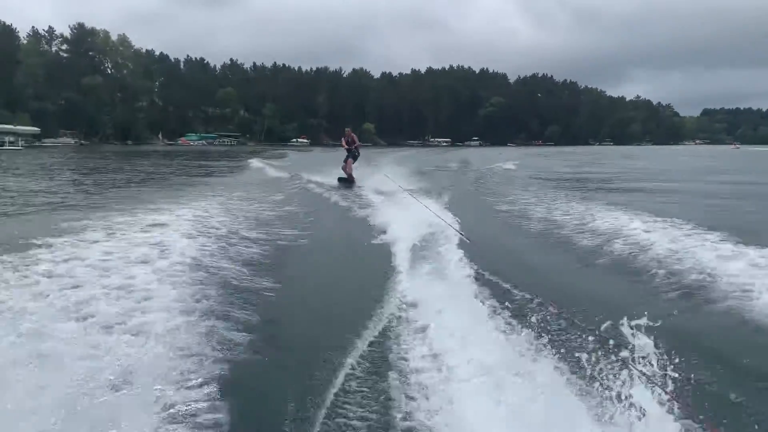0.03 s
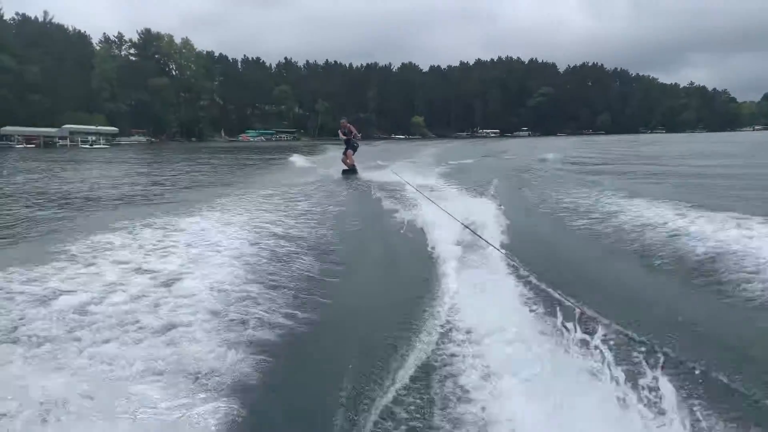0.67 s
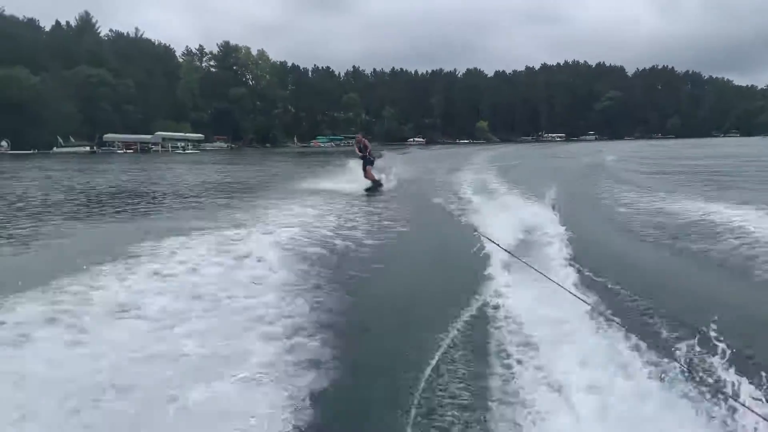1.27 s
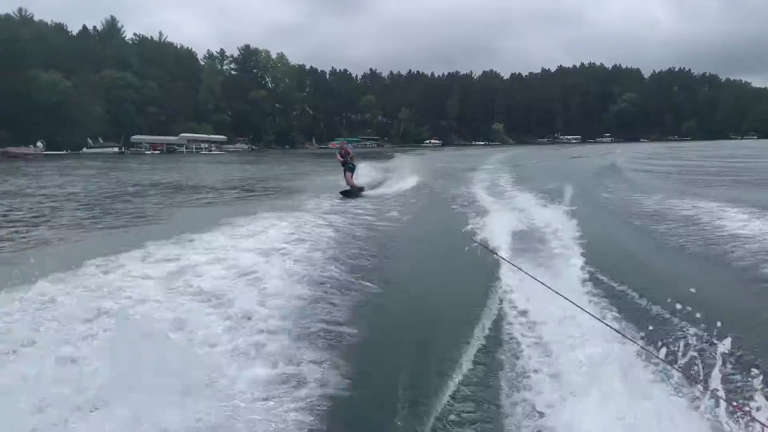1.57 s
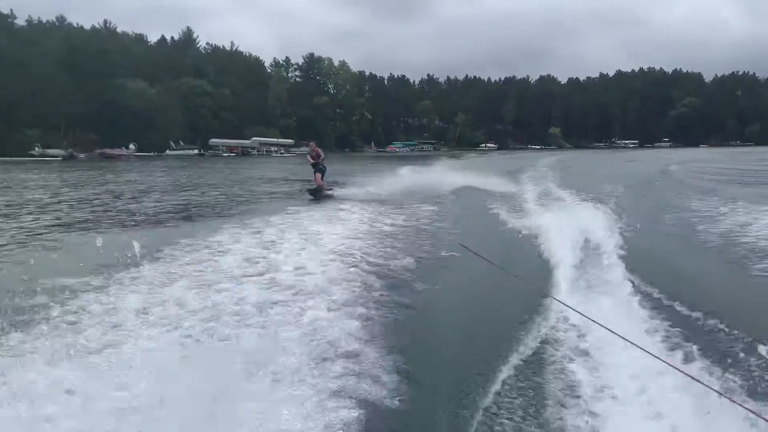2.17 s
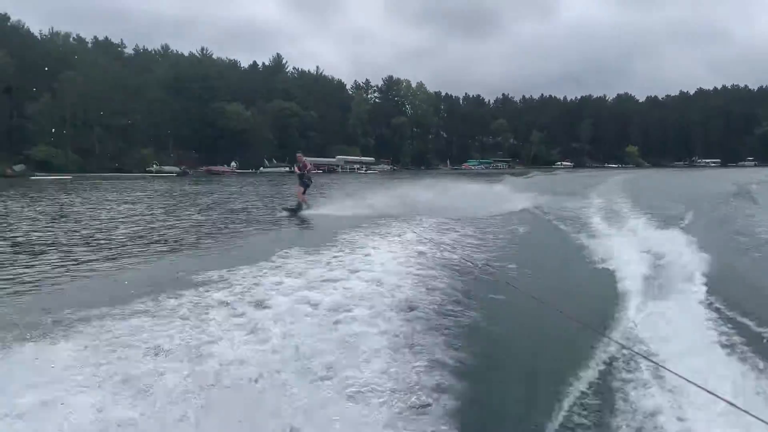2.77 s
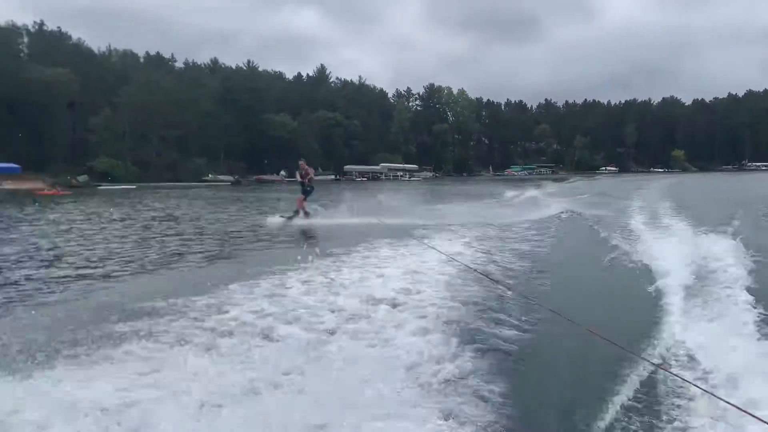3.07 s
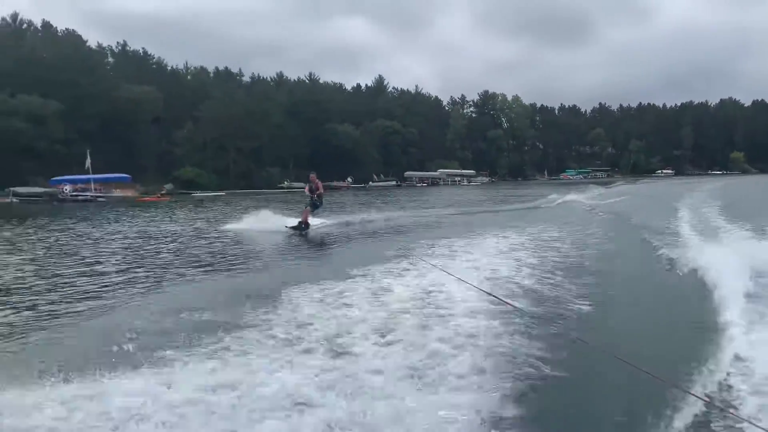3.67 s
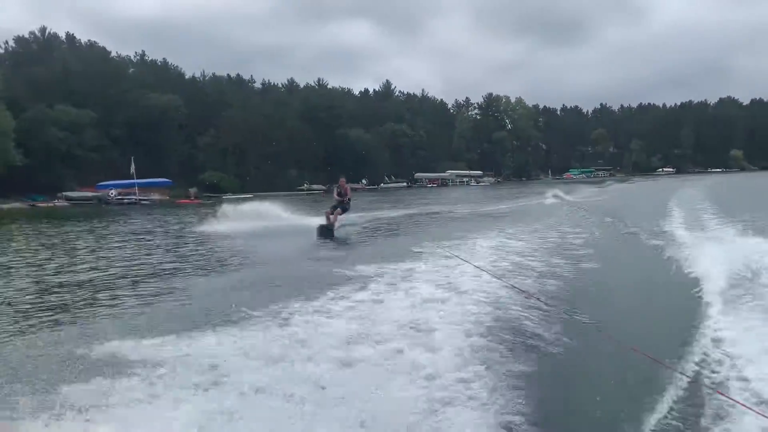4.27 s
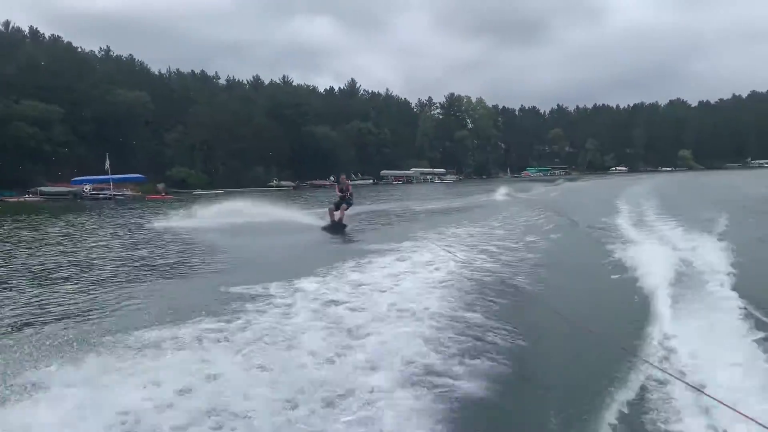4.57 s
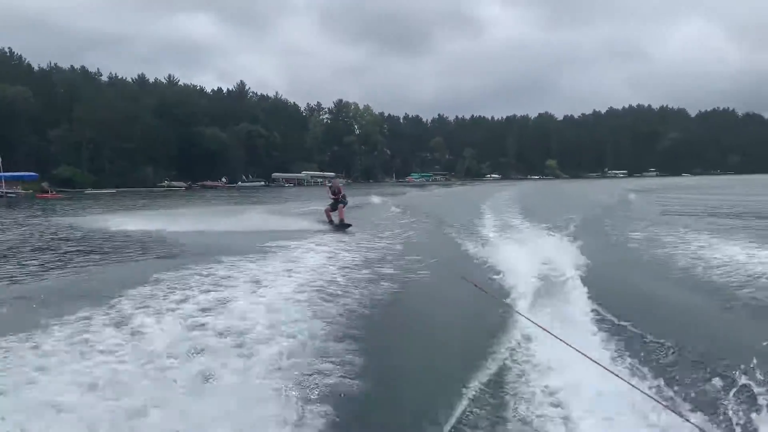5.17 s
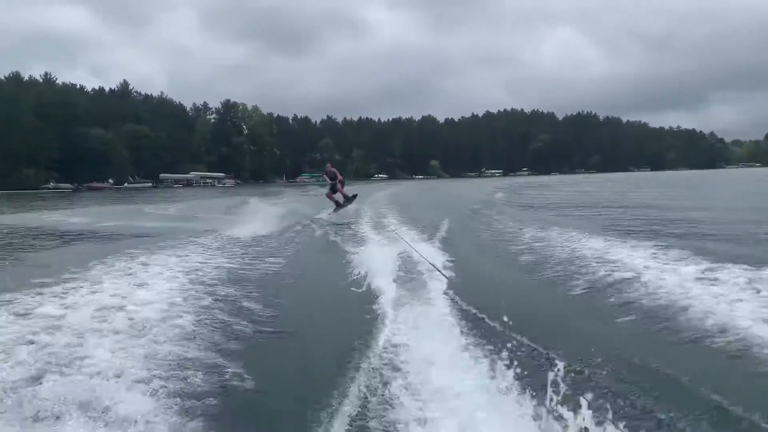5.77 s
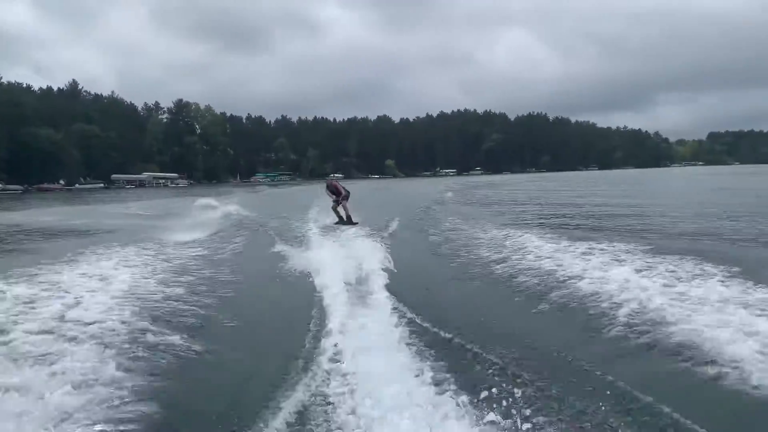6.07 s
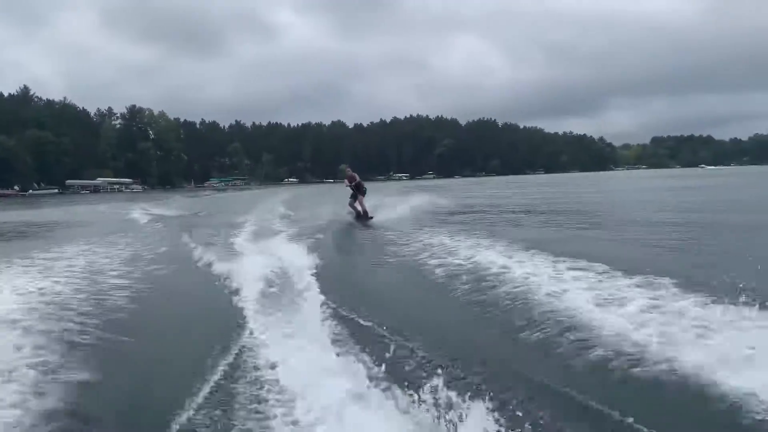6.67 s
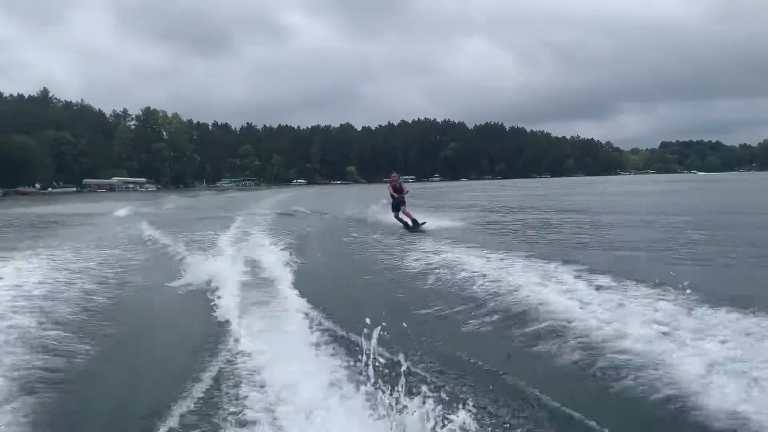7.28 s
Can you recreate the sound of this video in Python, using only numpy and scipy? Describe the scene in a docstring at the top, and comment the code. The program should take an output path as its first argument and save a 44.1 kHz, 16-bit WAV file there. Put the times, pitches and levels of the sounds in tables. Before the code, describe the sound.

Heard from the back of a moving tow boat, a low engine hum holds one pitch throughout, over the continuous rush of foaming water. Gusts keep hitting the microphone, adding a deep rumble and ragged puffs, with a strong cluster about halfway through. A few short washes of water rise from the hull, and the hiss of the wake softens slightly toward the end.

```python
"""A tow boat's exhaust drones at its firing rate, heard from the stern at steady speed on a lake.
The periodic firings give a strong fundamental, a rougher octave and faint upper partials.
Turbulent air rumbles and buffets on the two ports of a hand-held microphone. Behind the boat, drops
and bursting bubbles hiss in the wake, and sheets of water surge off the hull.
A wind filter with a rising crossover gradually folds the bass to mono."""
import sys
import numpy as np
from scipy import signal
from scipy.fft import rfft, irfft
from scipy.io import wavfile
from scipy.ndimage import uniform_filter1d, minimum_filter1d

SR = 44100
rng = np.random.default_rng(int(sys.argv[2]) if len(sys.argv) > 2 else 0)


def pcm_store(signal):
    """Save signal as 16-bit PCM."""
    levels = np.round(np.clip(np.atleast_2d(signal), -1, 1) * 32767)
    wavfile.write(sys.argv[1], SR, levels.astype(np.int16).T)


N = 328104
TIME, HZ = np.arange(N) / SR, np.fft.rfftfreq(N, 1 / SR)
CONTROL_TIME = np.linspace(0, N / SR, 16384)

# Firing rate of the engine: time_s, rate_hz
FIRING_RATE = [(0, 131), (.7, 131.4), (1.1, 130.8), (2.7, 130.6), (3.9, 131.6), (4.7, 131.1), (7.44, 130.6)]
# Fundamental in calm air: time_s, level_db
FUNDAMENTAL_LEVEL = [(0, -10.5), (.7, -9.5), (1.85, -11), (2.3, -10), (3.5, -10), (3.85, -11.5), (4.3, -11),
                     (7.44, -11)]
# Second harmonic in calm air: time_s, level_db
OCTAVE_LEVEL = [(0, -20.5), (.6, -23), (1.25, -19), (3.4, -21), (3.85, -25.5), (4.6, -22.5), (5.08, -27.5),
                (5.3, -16), (6.25, -23.5), (6.7, -18.5), (7.44, -23.5)]
# Upper partials, the last a faint gear whine: firing_rate_multiple, relative_level_db
PARTIALS = [(1.5, -44), (3, -43.5), (4, -41), (22, -58)]
# Swell common to the upper partials: time_s, gain_db
PARTIAL_SWELL = [(0, 3), (2.2, -0.5), (3, 7.5), (4, -2), (7.44, -1)]

def exhaust(force, max_dip_db=4, jitter_rad=0.064, smear_rad=1.48):
    """Periodic firings radiate through a muffler as a line spectrum; note and octave dip in gusts."""
    phase = 2 * np.pi * np.cumsum(curve(FIRING_RATE)) / SR + jitter_rad * wander(8.4)
    # reflections off the hull make the right port lag
    note_lag_rad, octave_lag_rad = np.array([[0], [0.96]]), np.array([[0], [2.845]])
    dip_db = max_dip_db / (1 + force ** -3)
    note_db = curve(FUNDAMENTAL_LEVEL) - dip_db + 0.77 * wander(37)
    note = gain_of(note_db) * np.cos(phase - note_lag_rad)
    # water sloshing over the outlet modulates the upper orders
    octave_db = curve(OCTAVE_LEVEL) - dip_db + 3.0 * wander(26)
    octave = gain_of(octave_db) * np.cos(2 * phase + 2.87 + 0.12 * wander(52) - octave_lag_rad)
    upper = sum(gain_of(db + 4.5 * wander(13)) * np.cos(multiple * phase + smear_rad * wander(11.3))
                for multiple, db in PARTIALS)
    return np.sqrt(2) * (note + octave + upper * gain_of(curve(PARTIAL_SWELL)))


# Spectrum of the rumble: frequency_hz, relative_level_db
RUMBLE_SPECTRUM = [(10, -34), (25, -24), (45, -4.5), (72, 0.5), (105, -6), (160, -9.5), (230, -13.5),
                   (310, -28.5), (500, -36), (1200, -100)]
# Spectrum of the flutter: frequency_hz, relative_level_db
FLUTTER_SPECTRUM = [(100, -30), (220, -5), (340, 2.5), (520, -1.5), (750, -7), (1200, -11), (2000, -27),
                    (4000, -22.5), (9000, -70)]
# Flutter at a wind force of 1: time_s, level_db
FLUTTER_LEVEL = [(0, -25), (1.2, -22.5), (2.3, -26.5), (3.0, -25), (4.3, -28), (5.4, -25.5), (6.2, -26.5),
                 (7.44, -26.5)]
# Likeness of the wind at the two ports: frequency_hz, correlation
WIND_CORRELATION = [(60, 0.8), (180, 0.68), (290, -0.28), (400, 0.17), (520, 0.36), (1000, 0.63),
                    (2500, -0.2)]
WIND_LAG_S = -0.00012  # the airstream reaches the left port first

def wind(force, rumble_db=-13, flutter_exponent=0.43):
    """Turbulent pressure at the ports: a rumble proportional to force, a flutter that grows less."""
    rumble = port_noise(RUMBLE_SPECTRUM, WIND_CORRELATION)
    rumble = unit_rms(rumble * gain_of(1.5 * wander(36))) * gain_of(rumble_db)
    flutter = port_noise(FLUTTER_SPECTRUM, WIND_CORRELATION, left_lag_s=WIND_LAG_S)
    flutter = unit_rms(flutter * gain_of(2.0 * wander(24))) * gain_of(curve(FLUTTER_LEVEL))
    return rumble * force + flutter * force ** flutter_exponent


# Gusts over the stern: crest_s, strength_db, half_width_s
STERN_GUSTS = [(.11, -3, 0.023), (.44, -10, 0.049), (.9, -5, 0.047), (1.26, -2.5, 0.079),
               (1.55, -8.5, 0.051), (1.81, -4, 0.083), (2.0, -0.5, 0.045), (2.42, -3, 0.046),
               (2.62, 1, 0.07), (2.96, -5, 0.087), (3.16, -2.5, 0.043), (3.6, 1, .04), (3.77, 2, 0.075),
               (4.0, -5, 0.088), (4.53, -20, 0.019), (4.71, -7, 0.023), (4.92, 1, 0.023),
               (5.3, -3.5, 0.077), (5.5, -5, 0.11), (5.88, -1.5, 0.057), (6.14, -3, .04),
               (6.62, -1.5, 0.055), (6.89, -5.5, 0.066), (7.18, -1, 0.086)]

def wind_force(headwind_db=-9.5):
    """The steady headwind and the gusts add in power; the result is an amplitude."""
    return np.hypot(gain_of(headwind_db), swells(STERN_GUSTS))


# Eddies that strike the ports: start_s, relative_peak_db, relative_treble_db
EDDIES = [(.126, -8, -21), (.354, -16, -22), (0.918, -11.5, -32), (1.119, -5.5, -30), (1.139, -9, -18),
          (1.215, -3, -25), (1.748, -5, -21), (1.852, -12, -18), (1.977, -11, -15), (1.985, 0.5, -16),
          (2.103, -15, -11), (2.421, -12, -18), (2.438, -7, -24), (2.608, -10.5, -21), (2.641, -10, -31),
          (3.002, -11, -41), (3.614, -10, -22), (3.721, -3.5, -13), (3.738, -5.5, -12), (3.755, -1.5, -17),
          (3.84, -6, -14), (4.083, -14, -35), (5.288, -13.5, -24), (5.466, -6, -32), (5.825, -21, -34),
          (7.147, -18, -24)]
# Spectrum of an eddy before its treble is tilted: frequency_hz, relative_level_db
EDDY_SPECTRUM = [(30, -24), (80, -18), (250, -4), (380, 3.5), (480, 4), (600, -3.5), (750, -8),
                 (1000, -11.5), (1500, -9), (2400, -17.5), (4500, -32), (10000, -58)]

def buffets(gain_db=-6.5, neutral_treble_db=-13, rise_s=0.0047, trail_s=0.017, ragged_db=2.6):
    """Each eddy is a pressure transient: a short ragged puff with a trail of decaying turbulence."""
    mix, t = np.zeros((2, N)), np.arange(4096) / SR
    ragged = gain_of(ragged_db * wander(430))
    rise = t / rise_s
    trail = .09 * (1 - np.exp(-rise)) * np.exp(-t / trail_s)
    envelope = rise * np.exp(1 - rise) + trail
    envelope_rms = np.sqrt(np.mean(envelope ** 2))
    for start_s, peak_db, treble_db in EDDIES:
        noise = port_noise(EDDY_SPECTRUM, WIND_CORRELATION, size=len(t), left_lag_s=WIND_LAG_S,
                           tilt_db_per_octave=0.97 * (treble_db - neutral_treble_db))
        puff = unit_rms(envelope * noise) * envelope_rms
        add(mix, start_s - .001, gain_of(peak_db + gain_db) * puff)
    return mix * ragged


# Strength of the spray: time_s, relative_level_db
SPRAY_LEVEL = [(0, -35), (2.08, -35.5), (2.36, -33.2), (2.52, -35), (3.13, -35), (3.3, -33), (3.6, -34),
               (3.83, -36.5), (4.65, -37), (5.1, -38), (5.65, -37), (6.1, -39), (7.44, -38)]
# Spectrum of the wake: frequency_hz, relative_level_db
WAKE_SPECTRUM = [(100, -31), (450, 8.5), (850, 4), (1200, 10.5), (1900, 9), (2800, 7.5), (3600, 6),
                 (4800, 6), (5600, 2.5), (7500, 3), (10000, 0.5), (12500, 1.5), (14300, 1), (15600, -70)]
# Likeness of the wake at the two ports: frequency_hz, correlation
WAKE_CORRELATION = [(500, -0.097), (1000, -0.71), (1800, 0.37), (2300, -0.38), (3200, -0.24), (5200, 0.24),
                    (5900, 0.66), (6500, 0.63), (7100, -0.47), (8500, 1), (11800, 1), (15000, 0.08)]
# Level difference of the wake between the ports: frequency_hz, left_minus_right_db
WAKE_LEVEL_DIFFERENCE = [(1000, -1.5), (4000, -0.5), (5000, -3.5), (5800, -6), (7500, -0.5), (10000, -0.5)]

def wake(gain_db=6.5, fizz_db=2.0, gurgle_db=1.1, drift_db=.7, seethe_db=0.56, gurgle_top_hz=5000):
    """Countless drops and bubbles sum incoherently to a hiss that brightens as the spray grows."""
    hiss = port_noise(WAKE_SPECTRUM, WAKE_CORRELATION, left_lag_s=13 / SR,
                      balance_db=spectrum_at(WAKE_LEVEL_DIFFERENCE, HZ))
    hz, t, spectra = signal.stft(hiss, SR, nperseg=1024)
    fizz = fizz_db * patches(spectra.shape, bins=2, frames=9)
    # only the larger bubbles gather in slowly drifting clouds, so the gurgle spares the top of the hiss
    clouds = gurgle_db * patches(spectra.shape, bins=9, frames=18)
    drift = drift_db * patches(spectra.shape, bins=8, frames=60)
    gurgle = (clouds + drift) / (1 + (hz[:, None] / gurgle_top_hz) ** 2)
    spray_db = curve(SPRAY_LEVEL, t)
    tilt = 0.28 * np.outer(np.tanh(np.log((hz + 1) / gurgle_top_hz)), spray_db - spray_db.mean())
    hiss = signal.istft(spectra * gain_of(fizz + gurgle + tilt))[1][:, :N]
    return unit_rms(hiss) * gain_of(curve(SPRAY_LEVEL) + gain_db + seethe_db * wander(6.1))


# Sheets of water thrown off the hull: crest_s, level_db, half_width_s
WATER_SHEETS = [(1.23, -33, .075), (2.42, -27.5, .029), (3.19, -28, 0.028), (3.57, -24.5, 0.029),
                (3.787, -29.5, 0.069), (4.325, -27, 0.02), (4.906, -28, 0.017), (5.26, -26, .013),
                (5.43, -27.5, .055), (7.157, -38, 0.034)]
# Spectrum of a sheet of water: frequency_hz, relative_level_db
SHEET_SPECTRUM = [(200, -36), (550, 5.5), (850, 3.5), (1300, 3.5), (2000, -2), (3500, -26), (8000, -45)]

def surges(churn_db=2.5):
    """A sheet of water is amplitude-modulated noise: it swells, churns and washes out."""
    splash = port_noise(SHEET_SPECTRUM, WIND_CORRELATION, left_lag_s=WIND_LAG_S)
    return swells(WATER_SHEETS) * unit_rms(splash * gain_of(churn_db * wander(70)))


def port_noise(spectrum, correlation, size=N, left_lag_s=0, balance_db=0, tilt_db_per_octave=0):
    """Partially coherent noise of rms 1 at the two ports; the tilt acts above 700 Hz."""
    hz = np.fft.rfftfreq(size, 1 / SR)
    common, independent = rfft(rng.standard_normal((2, size)))
    likeness = np.clip(spectrum_at(correlation, hz), -.99, .99)
    left = common * np.exp(-2j * np.pi * hz * left_lag_s) * gain_of(balance_db / 2)
    right = (likeness * common + np.sqrt(1 - likeness ** 2) * independent) / gain_of(balance_db / 2)
    octaves = np.log2(np.maximum(hz / 700, 1))
    colour = gain_of(spectrum_at(spectrum, hz) + tilt_db_per_octave * octaves)
    return unit_rms(irfft(np.array([left, right]) * colour, size))


def wander(rate_hz):
    """Random modulation of rms 1: noise low-passed at the given rate."""
    hz = np.fft.rfftfreq(len(CONTROL_TIME), CONTROL_TIME[1])
    slow = irfft(rfft(rng.standard_normal(len(CONTROL_TIME))) / (1 + (hz / rate_hz) ** 4))
    return np.interp(TIME, CONTROL_TIME, unit_rms(slow))


def patches(shape, bins, frames):
    """A random field of rms 1, smoothed over frequency bins and time frames."""
    field = rng.standard_normal(shape[::-1]).T
    return unit_rms(uniform_filter1d(uniform_filter1d(field, bins, axis=0), frames, axis=1))


def swells(rows):
    """A sum of Gaussian envelopes; each half width is a standard deviation."""
    total = sum(gain_of(db) * np.exp(-.5 * ((CONTROL_TIME - crest_s) / half_width_s) ** 2)
                for crest_s, db, half_width_s in rows)
    return np.interp(TIME, CONTROL_TIME, total)


def curve(rows, t=TIME):
    """Linear interpolation over time."""
    return np.interp(t, *np.transpose(rows))


def spectrum_at(rows, hz):
    """Linear interpolation over log frequency."""
    row_hz, values = np.transpose(rows)
    return np.interp(np.log(hz + 1), np.log(row_hz + 1), values)


def gain_of(db):
    """Decibels to amplitude."""
    return 10 ** (np.asarray(db) / 20)


def unit_rms(x):
    """Scales to rms 1."""
    return x / np.sqrt(np.mean(x ** 2) + 1e-20)


def add(mix, start_s, sound):
    """Superposes a stereo sound on the mix."""
    part = mix[:, max(round(start_s * SR), 0):][:, :sound.shape[1]]
    part += sound[:, :part.shape[1]]


def scene():
    """Superposition: the pressures of engine, air and water add at the two ports."""
    force = wind_force()
    return exhaust(force) + wind(force) + surges() + wake() + buffets()


# Crossover of the wind filter, below which both sides carry the left port: time_s, crossover_hz
MONO_CROSSOVER = [(0, 5), (1.92, 5), (2.0, 170), (2.3, 200), (2.7, 255), (3.4, 330), (4.8, 305), (5.8, 384),
                  (7.44, 490)]

def record(dry, ceiling=.92, band_edge_hz=15617):
    """High-passing the port difference makes the bass mono; a peak limiter and a low-pass follow."""
    left, right = dry
    hz, t, difference = signal.stft(right - left, SR, nperseg=2048)
    high_pass = 1 / (1 - 1j * (curve(MONO_CROSSOVER, t) / (hz[:, None] + 1)) ** 8)
    pair = np.array([left, left + signal.istft(difference * high_pass, SR)[1][:N]])
    allowed_gain = np.minimum(1, ceiling / (abs(pair).max(0) + 1e-9))
    limited = pair * uniform_filter1d(minimum_filter1d(allowed_gain, size=200), size=200)
    low_pass = signal.firwin(511, band_edge_hz, window=("kaiser", 9), fs=SR)
    return signal.oaconvolve(limited, low_pass[None], "same")


dry = scene()
out = record(dry)
pcm_store(out)
```